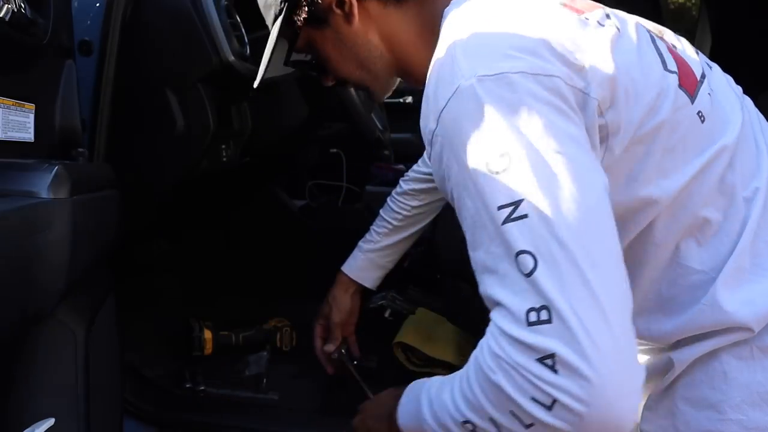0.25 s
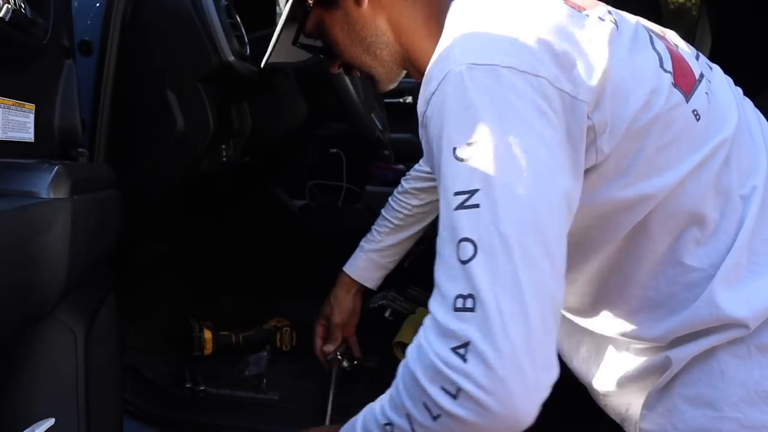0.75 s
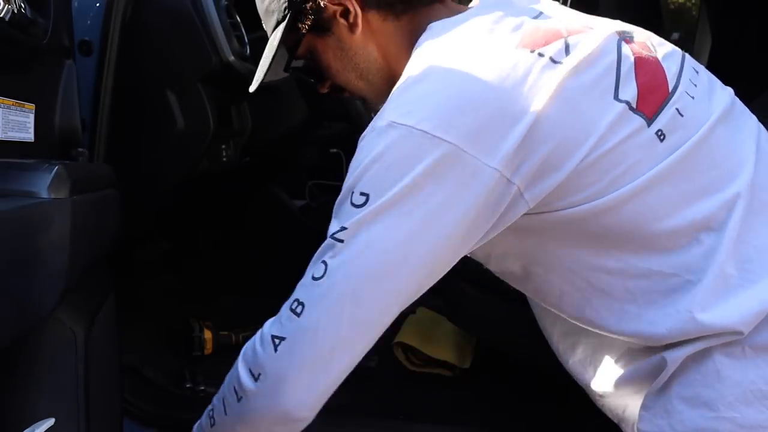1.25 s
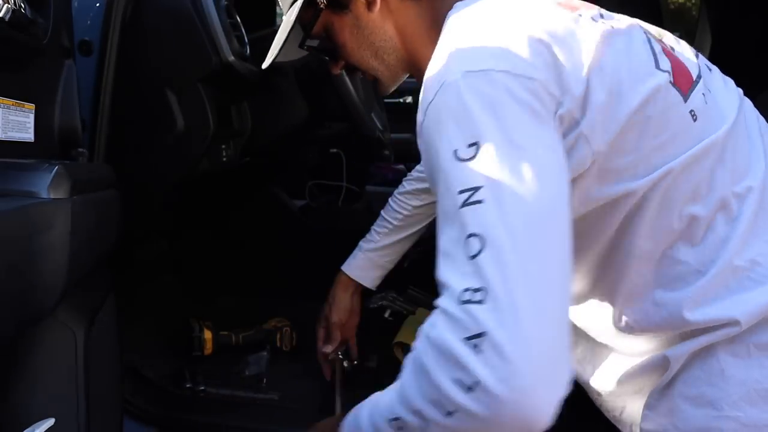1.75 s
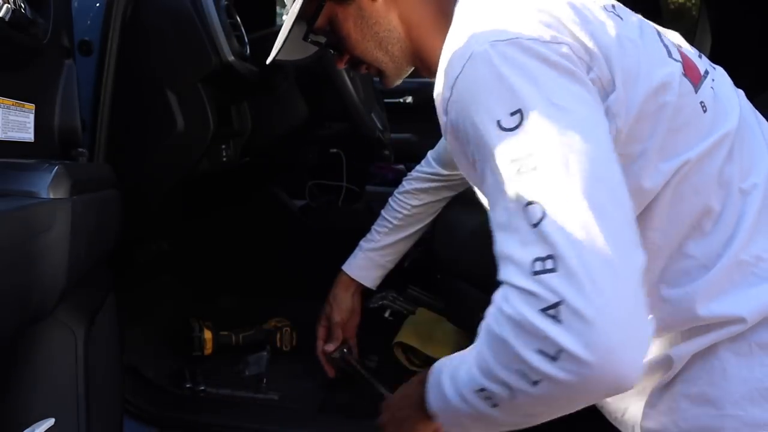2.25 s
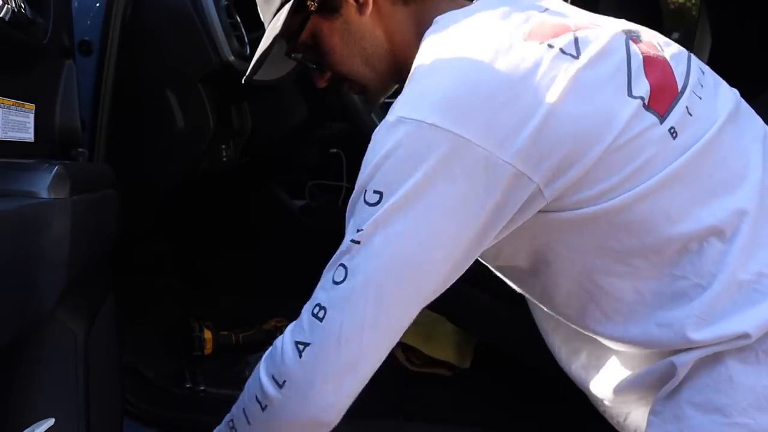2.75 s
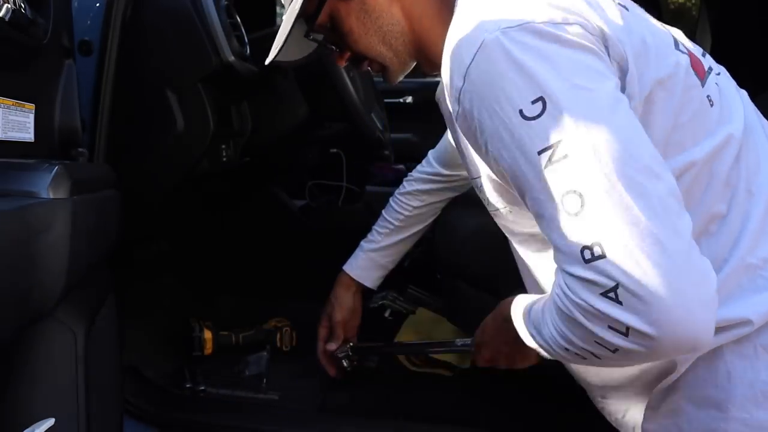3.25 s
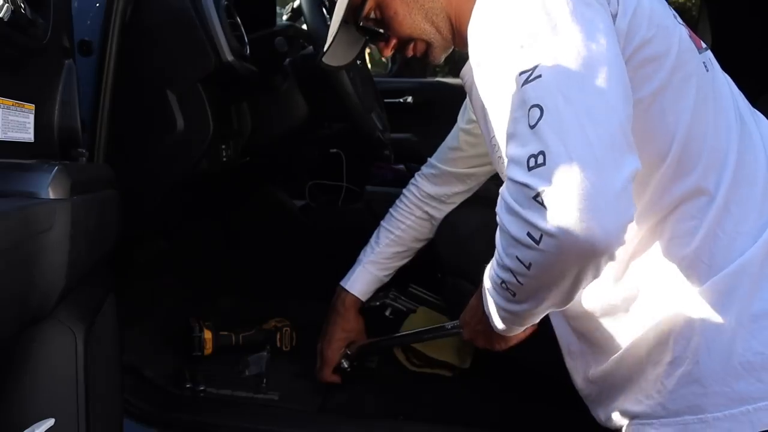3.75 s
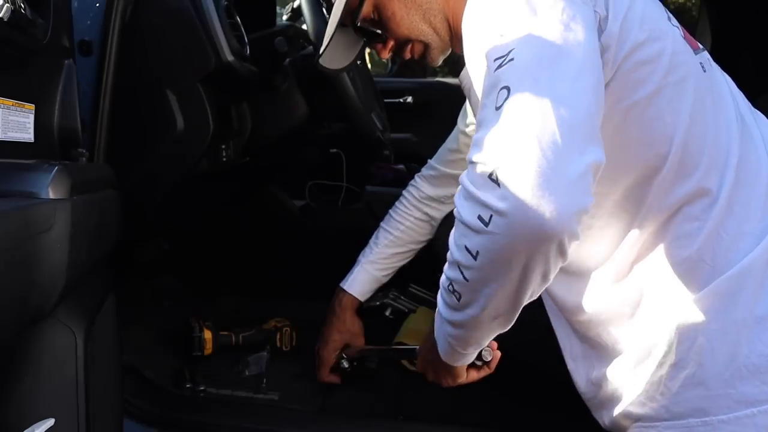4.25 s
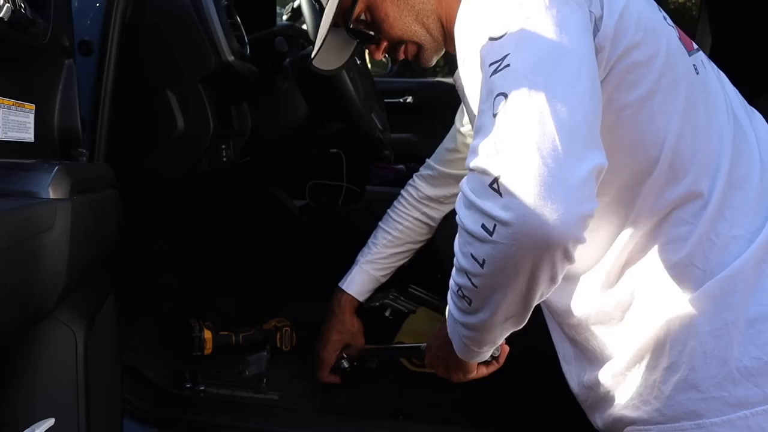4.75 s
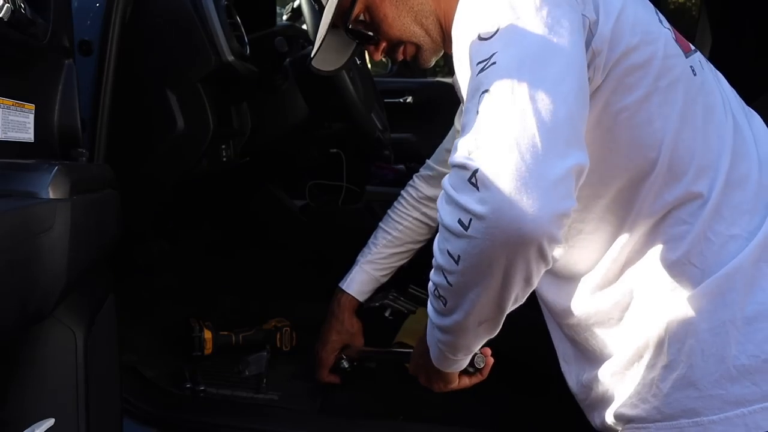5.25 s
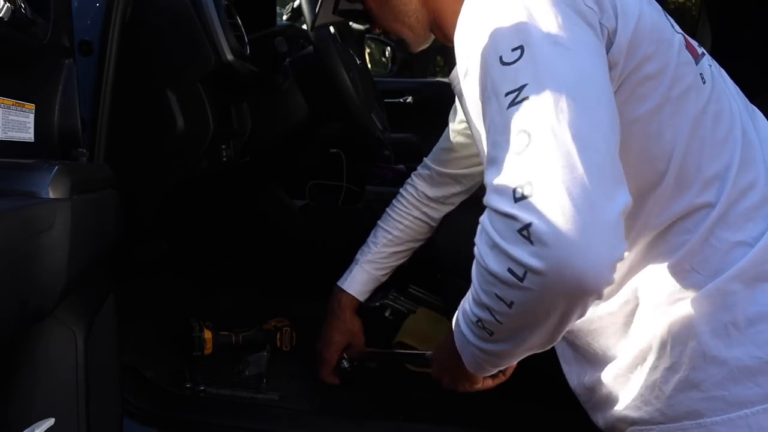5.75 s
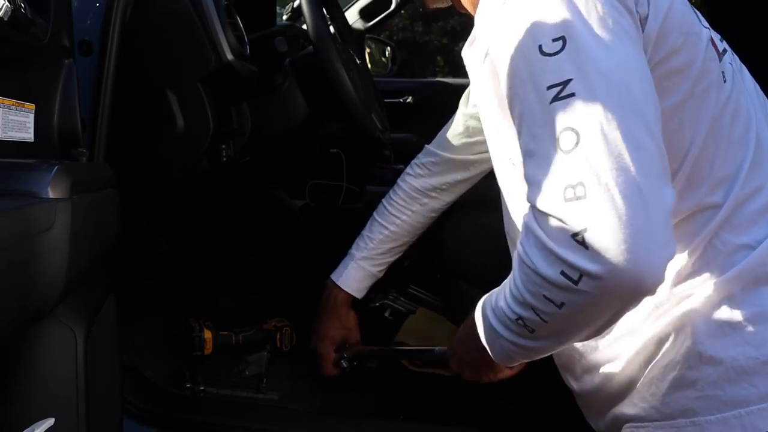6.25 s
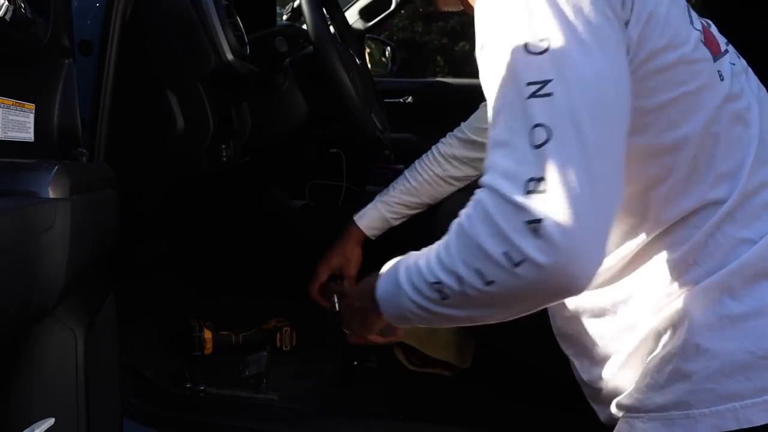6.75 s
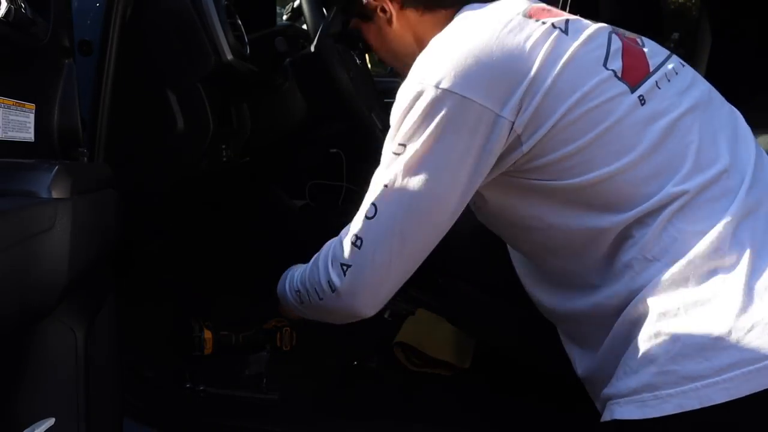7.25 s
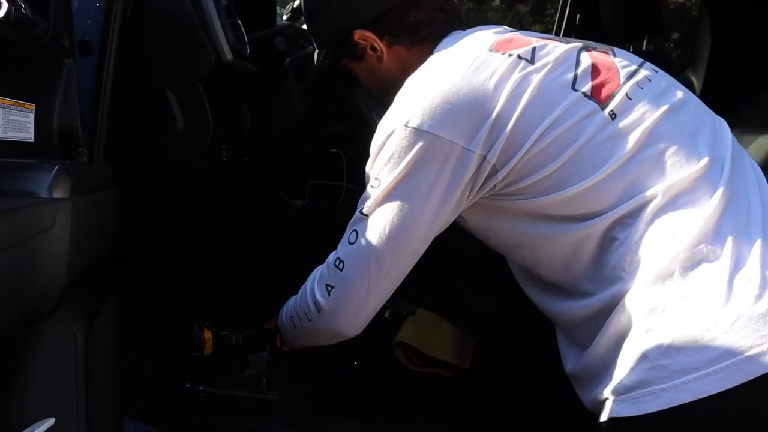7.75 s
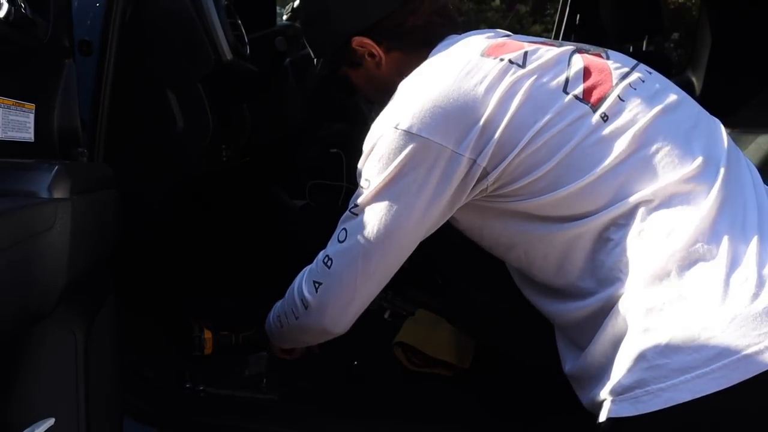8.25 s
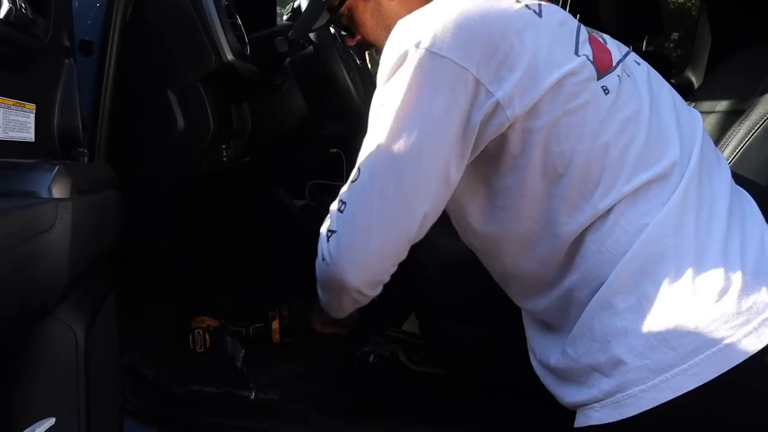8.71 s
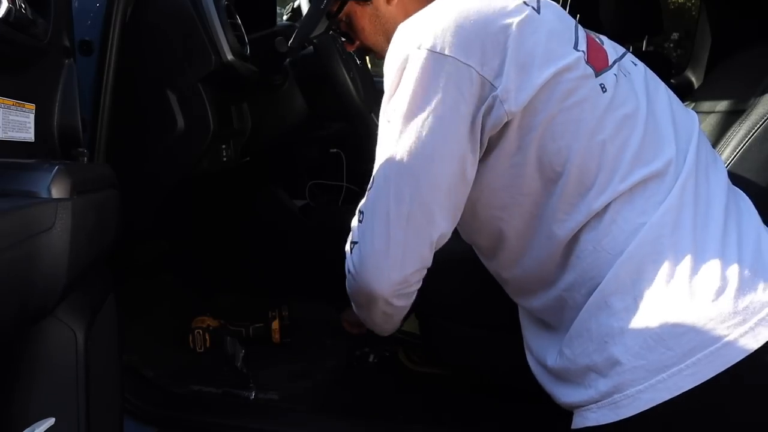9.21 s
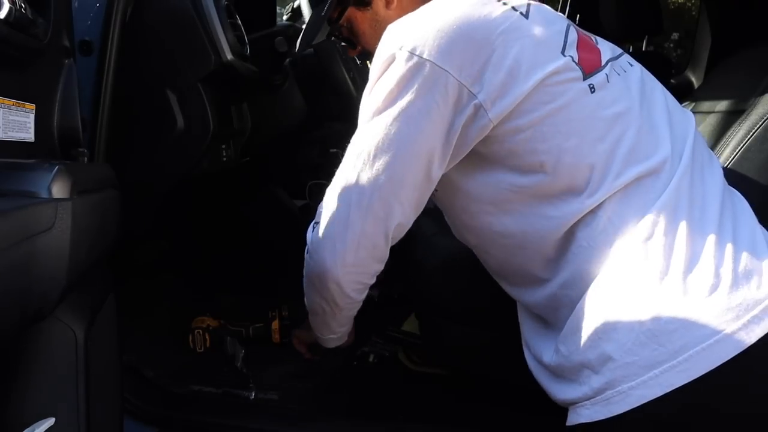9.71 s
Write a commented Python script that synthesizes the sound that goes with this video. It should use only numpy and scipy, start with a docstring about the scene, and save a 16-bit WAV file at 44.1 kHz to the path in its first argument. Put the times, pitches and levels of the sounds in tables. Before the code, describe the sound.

Bright ratchet ticks, sharp wrench snaps and fumbling tool knocks sound close up inside a parked truck over faint outdoor air.

```python
"""Bright ratchet clicks over faint outdoor air: a click-type torque wrench tightens seat bolts on the
floor of a parked truck cab. The pawl ticks on the back swings, the socket clinks, and socket and handle
knock about in fumbling hands. Under load the wrench breaks with a sharp snap and resets with a duller
one. Each blow runs down the bolt into the floor pan, so the steel on top gets a thump underneath.
A sleeve brushes past, and the cab sways with a low rumble."""
import sys
import numpy as np
from scipy import signal
from scipy.fft import rfft, irfft, next_fast_len
from scipy.io import wavfile
from scipy.ndimage import map_coordinates

SR = 44100
rng = np.random.default_rng(int(sys.argv[2]) if len(sys.argv) > 2 else 0)


def unload_wav(signal):
    """Save mono or channel-first audio to the path in sys.argv[1] as 16-bit WAV at rate SR, clipped to [-1, 1]."""
    wavfile.write(
        sys.argv[1],
        SR,
        np.round(np.clip(np.atleast_2d(signal).T, -1, 1) * 32767).astype(np.int16),
    )


N = 440118
TIME = np.arange(N) / SR
T = np.arange(16384) / SR  # time within one hit

# colour of the outdoor air: f/Hz, density/dB
AIR_COLOUR = [(12, -37), (20, -10.5), (53, -10.5), (86, -1), (193, -6.5), (248, -9.5), (347, -10),
              (446, -12.5), (499, -13), (849, -15.5), (923, -15), (2140, -27), (3440, -31), (14700, -36.5),
              (16000, -37)]
# the worker leans and the cab sways: centre t/s, length/s, level/dB
LEANS = [(6.0, .14, -56), (9.25, 0.55, -58)]
# the pawl drops into a tooth: t/s, level/dB, press of socket on bolt/dB, cab boom/dB
TEETH = [(0.149, -1, -1.5, -60), (0.327, -1.5, 2, -55), (1.763, 1, -0.5, -54), (1.846, 0.5, 1, -52),
         (1.9218, 0, 0.5, -61), (2.0001, 0, -1.5, -41), (2.097, 0, 0, -47), (3.035, 0.5, 1, -44),
         (3.1061, -0.5, -1, -47), (3.174, 1, 2, -39), (3.252, .5, 3, -42), (3.354, 0, -0.5, -55),
         (8.8407, -1.5, 8.5, -54), (8.972, -1.5, 7, -47)]
# modes of the ratchet head: f/Hz, level/dB, t60/s
HEAD_MODES = [(2595, -1.5, 0.055), (3146, 3.5, 0.04), (3325, -1, 0.072), (3510, -6, 0.067),
              (4170, -21, 0.049), (5120, -3, 0.078), (5410, -2, 0.032), (5800, -12.5, 0.039),
              (8400, -4, 0.048), (8400, -12, 0.041), (12500, 10, 0.029)]
# modes of the seat bracket and its bolt: f/Hz, level/dB, t60/s
BRACKET_MODES = [(517, 0.5, .08), (588.3, -0.5, 0.1), (768, -7.5, .1), (821.5, -3.5, .1),
                 (885.7, -2.5, 0.11), (1131, -6, 0.11), (1230, -12, 0.15), (1550, -14.5, .1),
                 (1703, -11, 0.14), (1931, -6.5, 0.065), (2126, -10, .11)]
# modes of the floor pan: f/Hz, level/dB, t60/s
PAN_MODES = [(107, -18, 0.22), (159.9, -9.5, 0.095), (199, -4.5, 0.11), (233, -2.5, 0.059),
             (281.4, 2, 0.089), (335.4, -11, 0.23), (388.3, -8, .22), (447, -13.5, 0.18)]
# colour of the dense, short-lived modes in a hit: f/Hz, density/dB
CLATTER_COLOUR = [(60, -3), (200, 13.5), (450, 8.5), (750, 6.5), (1000, 0), (1500, 2.5), (2100, 0.5),
                  (3400, -1), (5200, -4.5), (6300, -5.5), (8200, 0), (10000, -5.5), (12000, -6.5),
                  (16000, -7)]
# the socket clinks, each time at its own pitch: t/s, f/Hz, level/dB
CLINKS = [(0.149, 5310, -34.5), (7.727, 4530, -47), (8.841, 1900, -34.5), (8.972, 5240, -32.5)]
# socket and handle knock on bolt and floor: t/s, level/dB, hardness/dB, floor thump/dB
KNOCKS = [(0.677, -49.5, -6, -53.5), (1.644, -51, 4, -52), (2.276, -48.5, 0.5, -49),
          (2.859, -39.5, 3, -42.5), (2.9, -56.5, 9.5, -42.5), (5.803, -64, -5, -52.5), (5.964, -54, 6, -38),
          (6.251, -51, 0, -50), (6.409, -50, -9, -49), (6.465, -47.5, 2, -59), (6.4845, -37, 6, -49),
          (7.717, -28, -2.5, -35), (7.727, -40, 6.5, -35.5), (7.795, -46.5, -7, -48), (7.9, -56.5, 0, -51),
          (8.1784, -28, 4.5, -24), (8.325, -44.5, 0, -41.5), (8.467, -46, -4.5, -48),
          (8.4848, -32.5, 4, -33), (8.645, -39, -5.5, -43), (8.715, -46, -9, -42), (9.177, -37.5, 7, -29.5),
          (9.203, -39, -19, -41), (9.369, -56.5, -6, -48.5)]
# a knock's bolt and steel layers: offset from its level/dB, slope/(dB per dB of hardness)
KNOCK_LAYERS = [(-6.5, 0.8), (-13, 1.24)]
# the hands fumble with the tool: start t/s, length/s, level/dB
FUMBLES = [(1.596, .04, -54.5), (2.204, 0.023, -54.5), (2.284, .02, -53), (2.395, 0.022, -56.5),
           (2.876, .06, -49), (6.01, 0.045, -52), (6.203, 0.044, -51), (6.289, .14, -61),
           (8.093, 0.0294, -55), (8.215, .11, -49), (8.575, 0.095, -40), (9.014, .06, -46.5),
           (9.109, .06, -47), (9.231, 0.041, -49.5)]
# the torque mechanism breaks (sharp) or resets (dull): t/s, sharpness/dB, floor thump/dB
SNAPS = [(4.228, -0.5, -18.5), (4.6296, -12, -23.5), (5.1028, -1, -20), (5.5237, -12, -22.5),
         (5.928, -14.5, -43), (9.8925, -3.5, -19.5)]
# a snap's steel, treble, bolt and bracket layers: level at sharpness 0/dB, slope/(dB per dB)
SNAP_LAYERS = [(-26.5, 1), (-23, 2), (-27.5, 0.63), (-23.5, 0.58)]
# modes of the wrench's tube: f/Hz, level/dB, t60/s
TUBE_MODES = [(1730, 4.5, 0.13), (1850, -2, 0.15), (1970, -3, .13), (2600, -12, 0.047), (3580, 8.5, 0.095),
              (3703, -3, 0.046), (4020, -4, 0.2), (4100, -3, 0.21), (5450, -10, .1), (5700, -6, .15),
              (7670, 5, 0.083), (7960, 0, 0.13), (9140, -4.5, 0.11), (9720, -4, 0.15), (13900, -5.5, .06)]
# the palm slides along the handle: centre t/s, length/s, level/dB
PALM_SLIDES = [(6.4, 0.069, -69), (6.8, .3, -70.5), (7.33, .15, -77.5)]
# the worker shifts in his shirt: centre t/s, length/s, level/dB
SHIRT_MOVES = [(6.75, 0.53, -69), (7.53, 0.66, -67.5), (8.8, 0.94, -70), (9.7, 0.34, -72)]
# colour of the shirt's rustle: f/Hz, density/dB
SHIRT_COLOUR = [(880, -33.5), (1500, -2), (2080, -3), (2770, -7), (8000, -10.5), (14300, -21.5),
                (16000, -27.5)]
# colour of the sleeve's brush: f/Hz, density/dB
SLEEVE_COLOUR = [(200, -30), (400, -8), (600, -2), (900, -1), (1200, -3), (1900, -16), (3300, -15.5),
                 (7000, -28.5), (15000, -41)]


def amp(db):
    return 10 ** (np.asarray(db) / 20)


def unit(x):
    return x / np.sqrt(np.mean(x ** 2) + 1e-20)


def onset_unit(x):
    """Scale a hit to rms 1 over its first 20 ms."""
    return x / np.sqrt(np.mean(x[:SR // 50] ** 2) + 1e-20)


def add(track, s, x):
    """Mix x into the track at s seconds."""
    part = track[max(round(s * SR), 0):][:len(x)]
    part += x[:len(part)]


def noise(colour, size, window=np.ones_like):
    """Noise of rms 1, shaped by a colour curve and a frequency window."""
    f, db = np.transpose(colour)
    fft_size = next_fast_len(size)
    hz = np.fft.rfftfreq(fft_size, 1 / SR)
    gain = amp(np.interp(np.log(hz + 1), np.log(f), db)) * window(hz)
    return unit(irfft(rfft(rng.standard_normal(fft_size)) * gain, fft_size)[:size])


def wobble(rate):
    """A smooth random curve, rate knots a second."""
    return map_coordinates(rng.standard_normal(int(N * rate / SR) + 4), [TIME * rate])


def swells(moves, rest_db=-120):
    """Gain curve: each move fades in and out as a bell shape over a resting level."""
    power = sum(amp(db) ** 2 * np.exp(-(2 * (TIME - s) / length) ** 2) for s, length, db in moves)
    return np.sqrt(amp(rest_db) ** 2 + power)


def strike(modes, lo_hz, hi_hz, ring_db, t60, tail_db, tail_t60, rise, spike_db):
    """One band of a hit: clear modes ring over a noise crack (contact spike, body, the cab's tail)."""
    def band(hz):
        return 1 / np.sqrt((1 + (lo_hz / (hz + 1)) ** 14) * (1 + (hz / hi_hz) ** 14))

    ring = np.zeros(len(T))
    for k, (hz, db, mode_t60) in enumerate(modes):
        gain = amp(db + rng.normal(0, 3.6)) * band(hz)
        pitch = hz * (1 + rng.normal(0, .005))
        if band(hz) > .1:
            # rattling joints make the phase wander, which widens each line
            wander = np.cumsum(rng.standard_normal(len(T))) * np.sqrt(2 * np.pi * .004 * hz / SR)
            ring += (-1) ** k * gain * amp(-60 * T / mode_t60) * np.sin(2 * np.pi * pitch * T + wander)
    spike = amp(spike_db - 60 * T / .012)
    body = amp(-60 * T / t60)
    tail = amp(tail_db - 60 * T / tail_t60)
    attack = 1 - np.exp(-T / rise)
    crack = onset_unit(noise(CLATTER_COLOUR, len(T), band) * np.hypot(spike + body, tail) * attack)
    return onset_unit(crack + amp(ring_db) * onset_unit(ring * attack))


def resonance(hz, t60, rise):
    """A single tone that swells and dies away."""
    shape = amp(-60 * T / t60) * (1 - np.exp(-T / rise)) ** 2
    return shape / shape.max() * np.sin(2 * np.pi * hz * T) * (1 - T / T[-1])


def ambience(air_db=-61.5, whine_hz=14820):
    """The bed: quiet outdoor air through the open door and a faint high whine."""
    drift = amp(.8 * wobble(5))
    air = amp(air_db) * drift * noise(AIR_COLOUR, N)
    whine = noise([(20, 0), (SR / 2, 0)], N, lambda hz: np.exp(-((hz - whine_hz) / 110) ** 2))
    return air + amp(-88) * whine


def cab_sway(rock_db=-38.5, rock_t60=2):
    """Low rumble: the cab follows the worker's weight and rocks on after each snap."""
    rocking = sum((TIME > s) * amp(thump_db + rock_db - 60 * np.abs(TIME - s) / rock_t60)
                  for s, _, thump_db in SNAPS)
    rumble = noise([(15, -23.5), (30, -8.5), (41, 0), (60, -12), (90, -8.5), (200, -42), (600, -100)], N)
    return (swells(LEANS, rest_db=-81.5) + rocking) * rumble


def ratchet(usual_gap_s=.1, swing_pause_s=.4):
    """The pawl ticks as it lifts, then drops into a tooth; swing speed sets lead, ping and decay."""
    out = np.zeros(N)
    between = np.diff([row[0] for row in TEETH])
    before, after = np.append(np.inf, between), np.append(between, usual_gap_s)
    gaps = np.where(before < swing_pause_s, before, after)  # a swing's first tooth looks ahead
    for (s, db, press_db, boom_db), gap in zip(TEETH, gaps):
        slowness = gap / usual_gap_s
        loose = 1.38 / slowness ** .33  # a faster swing has a looser grip and a longer decay
        head_db = db - .63 * press_db  # pressing damps the head and drives the bolt
        bolt_db = db + press_db
        socket_db = db + 3 * np.log2(slowness)  # a slow swing pings more
        spring_db = head_db + rng.normal(-50, 2.5)
        lift = amp(head_db - 43.5) * strike(HEAD_MODES, 3580, 13800,
            ring_db=0, t60=.048, tail_db=-22.5, tail_t60=.11, rise=.0003, spike_db=-7)
        steel = amp(head_db - 34.7) * strike(HEAD_MODES, 2530, 4880,
            ring_db=-1.5, t60=.048 * loose, tail_db=-20.5, tail_t60=.29, rise=.00019, spike_db=3)
        socket = amp(socket_db - 38) * strike(HEAD_MODES, 5200, 4640,
            ring_db=-15.5, t60=.04 * loose, tail_db=-21.5, tail_t60=.28, rise=.0003, spike_db=-6)
        treble = amp(head_db - 34) * strike(HEAD_MODES, 7200, 13400,
            ring_db=-10, t60=.031 * loose, tail_db=-23, tail_t60=.23, rise=.000094, spike_db=2)
        spring_hz = 9140 * (1 + rng.normal(0, .003))
        spring = amp(spring_db) * onset_unit(resonance(spring_hz, t60=.12, rise=.0023))
        bolt = amp(bolt_db - 41) * strike(BRACKET_MODES, 1130, 2650, ring_db=-1.5,
            t60=.075 * loose, tail_db=-12.5, tail_t60=.23 * loose, rise=.00059, spike_db=-17)
        bracket = amp(bolt_db - 40.5) * strike(BRACKET_MODES, 520, 893,
            ring_db=-5, t60=.075 * loose, tail_db=-15, tail_t60=.24 * loose, rise=.0004, spike_db=-16)
        pan = amp(bolt_db - 48) * strike(PAN_MODES, 150, 425,
            ring_db=-10.5, t60=.042, tail_db=-1.5, tail_t60=.28, rise=.0023, spike_db=-20)
        boom = amp(boom_db + 3.5) * resonance(hz=107.4, t60=.22, rise=.018)
        add(out, s - .1 * gap, lift)
        add(out, s, steel + socket + treble + spring + bolt + bracket + pan + boom)
    return out


def socket_clinks():
    """A quick metallic ping and faint ring on top of some ratchet clicks and a knock."""
    out = np.zeros(N)
    for s, hz, db in CLINKS:
        ping = resonance(hz, t60=.018, rise=.00063)
        ring = amp(-25) * resonance(hz, t60=.18, rise=.0016)
        add(out, s, amp(db) * onset_unit(ping + ring))
    return out


def floor_tuning(s, second_bolt_s=7):
    """Pitch ratio and modes of the pan: the second bolt sits on stiffer floor, which rings higher."""
    ratio = 1.19 if s > second_bolt_s else 1
    return ratio, [(hz * ratio, db, t60) for hz, db, t60 in PAN_MODES]


def tool_knocks():
    """Socket and handle knock: soft hits are mostly floor and bracket, hard ones add bolt and steel."""
    out = np.zeros(N)
    for s, db, hardness_db, thump_db in KNOCKS:
        bolt_db, steel_db = [db + offset + slope * hardness_db for offset, slope in KNOCK_LAYERS]
        _, floor_modes = floor_tuning(s)
        pan = amp(thump_db - 2) * strike(floor_modes, 238, 330,
            ring_db=-6, t60=.046, tail_db=-18.5, tail_t60=.35, rise=.00067, spike_db=-19)
        thud = amp(thump_db - 9) * strike(PAN_MODES, 90, 179,
            ring_db=-9, t60=.074, tail_db=-15, tail_t60=.41, rise=.0036, spike_db=-23)
        boom = amp(thump_db - 10) * resonance(hz=102.5, t60=.18, rise=.013)
        bracket = amp(db - 1.5) * strike(BRACKET_MODES, 480, 1165,
            ring_db=-5.5, t60=.089, tail_db=-18.5, tail_t60=.38, rise=.002, spike_db=-15)
        bolt = amp(bolt_db - 2.5) * strike(BRACKET_MODES, 1160, 3060,
            ring_db=-3, t60=.1, tail_db=-15.5, tail_t60=.3, rise=.0023, spike_db=-18)
        steel = amp(steel_db - 1.5) * strike(HEAD_MODES, 1800, 5400,
            ring_db=-6, t60=.053, tail_db=-18.5, tail_t60=.24, rise=.00089, spike_db=-14)
        treble = amp(steel_db - 10.5) * strike(HEAD_MODES, 5000, 11300,
            ring_db=-16, t60=.046, tail_db=-23.5, tail_t60=.16, rise=.00074, spike_db=-20)
        add(out, s, pan + thud + boom + bracket + bolt + steel + treble)
    return out


def fumbling(bumps_per_s=33, scatter_db=1.5):
    """Soft, uneven bumps on floor and bracket while the tool is moved and seated."""
    out = np.zeros(N)
    for start, length, db in FUMBLES:
        count = max(round(length * bumps_per_s), 1)
        for k in range(count):
            pan = strike(PAN_MODES, 110, 350,
                ring_db=-10, t60=.066, tail_db=-14.5, tail_t60=.3, rise=.0048, spike_db=-25)
            bracket = amp(-4) * strike(BRACKET_MODES, 470, 1210,
                ring_db=-4.5, t60=.091, tail_db=-12, tail_t60=.37, rise=.004, spike_db=-20)
            s = start + length * (k + .5 * rng.random()) / count
            add(out, s, amp(rng.normal(db, scatter_db)) * (pan + bracket))
    return out


def torque_snaps():
    """The tube cracks as the toggle flips over; the jolt reaches the floor pan a moment later."""
    out = np.zeros(N)
    for s, sharp_db, thump_db in SNAPS:
        steel_db, treble_db, bolt_db, bracket_db = [db + slope * sharp_db for db, slope in SNAP_LAYERS]
        slip = amp(treble_db - 14.5) * strike(TUBE_MODES, 2000, 12000,
            ring_db=-8.5, t60=.025, tail_db=-26, tail_t60=.08, rise=.0004, spike_db=-12.5)
        spring_rebound = amp(treble_db - 27) * strike(TUBE_MODES, 8500, 11500,
            ring_db=-3, t60=.07, tail_db=-18.5, tail_t60=.15, rise=.003, spike_db=-25)
        steel = amp(steel_db) * strike(TUBE_MODES, 3100, 5700,
            ring_db=-10.5, t60=.05, tail_db=-22, tail_t60=.32, rise=.0003, spike_db=-7)
        # a harder snap opens up the top end and leaves the tube singing
        top_hz = 13500.5 + 170 * (treble_db + 23.5)
        treble = amp(treble_db) * strike(TUBE_MODES, 5087, top_hz,
            ring_db=-10.5, t60=.039, tail_db=-27, tail_t60=.19, rise=.0003, spike_db=-8)
        singing = amp(treble_db - 14) * strike(TUBE_MODES, 3950, 4280,
            ring_db=5, t60=.22, tail_db=-15, tail_t60=.32, rise=.001, spike_db=-20)
        bolt = amp(bolt_db) * strike(TUBE_MODES, 1600, 2700,
            ring_db=-3.5, t60=.1, tail_db=-8.5, tail_t60=.18, rise=.0005, spike_db=-7)
        bracket = amp(bracket_db) * strike(BRACKET_MODES, 500, 1350,
            ring_db=-1, t60=.11, tail_db=-11, tail_t60=.24, rise=.0016, spike_db=-11.5)
        ratio, floor_modes = floor_tuning(s)
        pan = amp(thump_db - 5) * strike(floor_modes, 83, 480 * ratio,
            ring_db=-1.5, t60=.048, tail_db=-8, tail_t60=.31, rise=.001, spike_db=-21)
        punch = amp(thump_db) * floor_flex(hz=235 * ratio, delay=.0058)
        # low end: the whole cab shakes on its mounts
        shake = amp(thump_db - 22.5) * resonance(hz=42, t60=.3, rise=.012)
        shake += amp(thump_db - 18) * resonance(hz=78, t60=.27, rise=.0068)
        add(out, s - .004, slip)
        add(out, s, steel + treble + singing + bolt + bracket + punch + shake)
        add(out, s + .004185, pan)
        add(out, s + .046, spring_rebound)
    return out


def floor_flex(hz, delay):
    """The floor pan gives and springs back once."""
    cycles = (T - delay) * hz
    return onset_unit(np.sin(2 * np.pi * cycles) * np.exp(-2 * cycles ** 2))


def palm_slides():
    """A thin hiss as the palm slides along the handle."""
    hiss = noise([(5000, -31), (9000, -6), (12500, 0), (15000, -7)], N)
    return swells(PALM_SLIDES) * hiss * amp(-2 + 1.5 * wobble(25))


def shirt_rustle():
    """The shirt rustles faintly, swelling as the worker shifts."""
    return swells(SHIRT_MOVES, rest_db=-79) * noise(SHIRT_COLOUR, N) * amp(1.2 * wobble(42))


def sleeve_brush(start_s=6.79, attack_s=.059, hold_s=.039, release_s=.036, level_db=-43.5):
    """A sleeve brushes past in one short, grainy swish."""
    corners = start_s + np.cumsum([0, attack_s, hold_s, release_s])
    stroke = amp(level_db) * np.interp(TIME, corners, [0, 1, 1, 0])
    return stroke * unit(noise(SLEEVE_COLOUR, N) * amp(2.5 * wobble(220)))


def scene():
    """Wrench, cloth and bed, close together in the cab, in mono."""
    wrench = ratchet() + torque_snaps() + tool_knocks() + socket_clinks()
    handling = sleeve_brush() + shirt_rustle() + palm_slides()
    bed = ambience() + cab_sway()
    return (wrench + handling + bed + fumbling())[None]


def record(dry, top_hz=16200):
    """A steep low-pass takes off the very top."""
    return signal.sosfilt(signal.ellip(10, .1, 90, top_hz, fs=SR, output='sos'), dry)


dry = scene()
out = record(dry)
unload_wav(out)
```